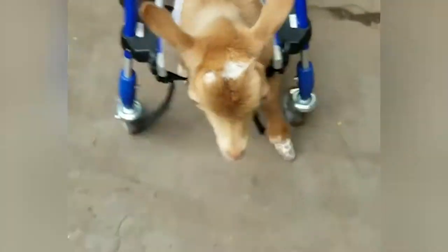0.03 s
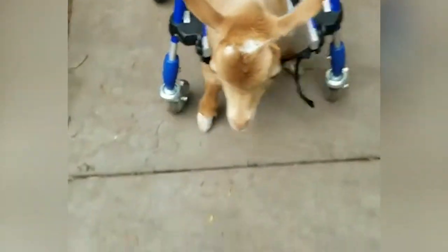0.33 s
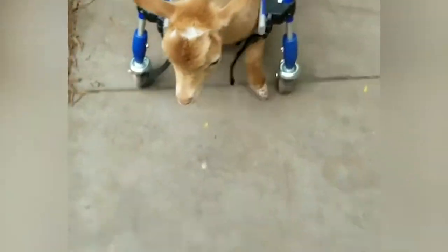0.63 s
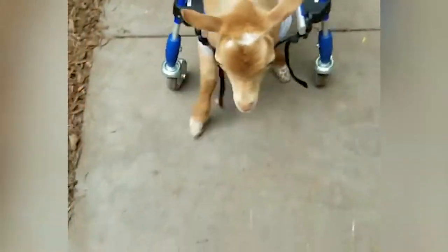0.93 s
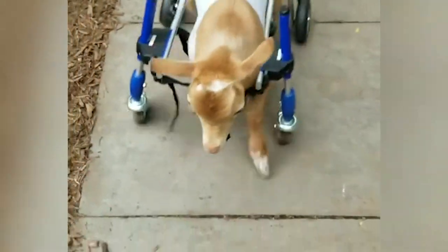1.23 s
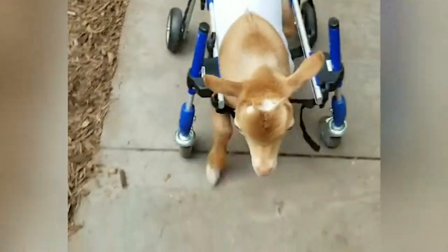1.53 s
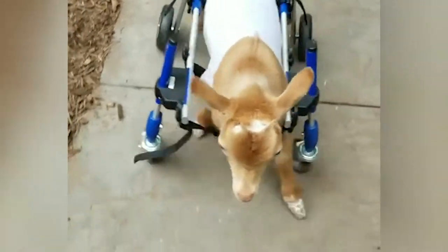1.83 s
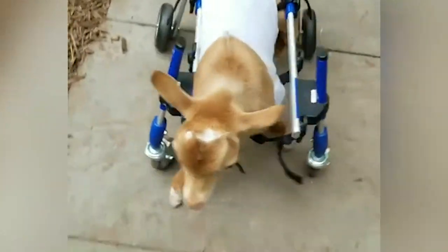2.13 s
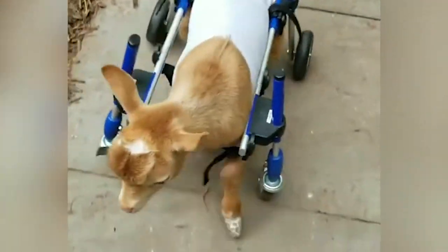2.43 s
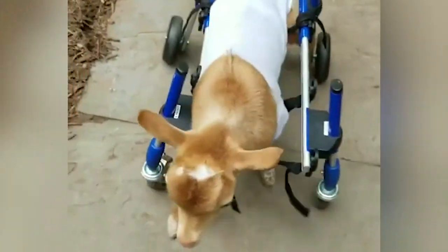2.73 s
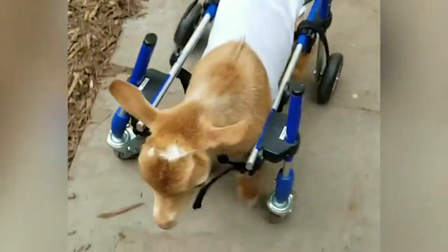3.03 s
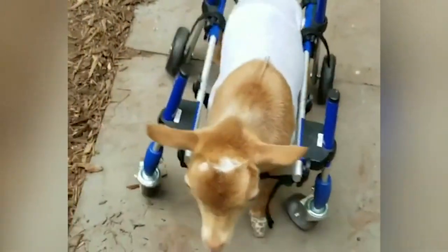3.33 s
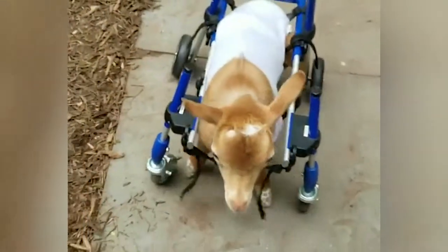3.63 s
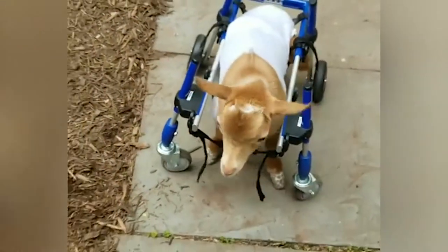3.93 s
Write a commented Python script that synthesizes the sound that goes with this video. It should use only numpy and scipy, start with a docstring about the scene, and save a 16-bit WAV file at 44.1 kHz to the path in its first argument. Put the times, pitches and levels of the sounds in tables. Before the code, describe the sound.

A small wheeled cart rattles over concrete close by in a quiet yard, with uneven metal clinks and plastic knocks above a gritty roll. A young goat's hooves tap and scuff in between, clearest near 1.4 and 2.6 seconds. A caster squeaks faintly at 2.4. Around 3.4 come quick taps, one sharp flick on the microphone's right side and a hollow knock; then the cart almost stops by 4 seconds.

```python
"""Goat in a wheeled cart

A young goat walks over concrete slabs in a small support cart, close by in a quiet yard.
Loose casters and frame joints clack over the gritty roll of the wheels; hooves tap and scuff between.
One caster squeaks, something flicks the right microphone port once, and the cart comes almost to rest."""
import sys
import numpy as np
from scipy import signal
from scipy.fft import rfft, irfft
from scipy.io import wavfile
from scipy.ndimage import uniform_filter1d

SR = 44100
rng = np.random.default_rng(int(sys.argv[2]) if len(sys.argv) > 2 else 0)


def transcribe(u):
    """Save the signal u as a 16-bit wav file named by the first command-line argument.

    u: samples, shape (n,) or (channels, n), limited to [-1, 1]; the rate is SR.
    q: integer samples, one column per channel.
    """
    v = np.clip(np.atleast_2d(u).T, -1, 1)
    q = np.round(v * 32767).astype(np.int16)
    wavfile.write(sys.argv[1], SR, q)


N = 176400

# Tone colours of the air, low rumble, wheel body, grit, hoof tap, plastic knock and metal clink.
# Each row: frequency in Hz, relative level in dB.
AIR_COLOUR = [(20, -13), (60, 9), (130, -2), (300, -24), (1000, -34), (3000, -25.5), (7500, -39.5),
              (9000, -65)]
RUMBLE_COLOUR = [(15, -21), (30, -15.5), (55, -2.5), (85, 2), (125, 2), (190, -6.5), (300, -16), (600, -32),
                 (2000, -77)]
WHEEL_COLOUR = [(80, -9), (250, 2), (450, 1.5), (800, 2.5), (1200, 1.5), (2200, -1.5), (3300, -13),
                (7000, -55)]
GRIT_COLOUR = [(1200, -20.5), (2400, 3), (3300, -1), (4300, -1), (5300, 0), (6000, -0.5), (6600, -12),
               (7400, -1), (8000, -3), (8700, -31.5), (9700, -58)]
HOOF_COLOUR = [(100, -14.5), (300, 3), (750, 1), (1500, -2), (2500, -4.5), (5000, -12.5), (9500, -43)]
KNOCK_COLOUR = [(100, -31), (250, 2), (450, -2), (800, 1), (1500, 2.5), (2500, 2.5), (3600, -7),
                (7000, -44.5)]
CLINK_COLOUR = [(1200, -40.5), (2300, -2.5), (3200, -2), (4200, 0.5), (5600, 0), (6200, -2), (6700, -5.5),
                (7500, -0.5), (8300, -9.5), (9500, -24.5), (10500, -49)]
# The yard's short tail. Each row: frequency in Hz, seconds to fall 60 dB.
YARD_DECAY = [(100, 0.29), (500, 0.21), (2000, 0.18), (5000, 0.18), (9000, 0.12)]
# Fader ride of the rumble. Each row: time in seconds, relative level in dB.
RUMBLE_RIDE = [(0.0, -47.5), (3.46, -51.5), (4.0, -61.5)]
# Fader rides of the roll. Each row: time in seconds, relative levels of grit and wheel body in dB.
ROLL_RIDE = [(0,-56,-55.5), (.23,-49,-53), (.28,-55,-55.5), (.385,-57,-60), (.43,-51.5,-50), (.51,-56,-54),
             (.57,-63,-65), (.62,-57.5,-51.5), (.8,-53.5,-57), (1.0,-53,-55), (1.28,-55,-55),
             (1.47,-50.5,-51.5), (1.605,-61,-58.5), (1.67,-50.5,-55.5), (1.92,-57,-54.5), (2.0,-46,-48.5),
             (2.12,-57.5,-63.5), (2.28,-52,-51.5), (2.45,-55,-57.5), (2.69,-44.5,-47), (2.78,-56,-56.5),
             (2.98,-52.5,-54), (3.19,-59.5,-64.5), (3.32,-59,-52), (3.45,-50,-55.5), (3.62,-63,-66),
             (3.72,-70,-70.5), (4.0,-76,-87)]
# Hoof scuffs and caster skids. Each row: start and length in seconds, relative level in dB, centre in Hz.
SCUFFS = [(.597,0.039,-44.5,1230), (.945,0.027,-42,4500), (1.185,0.032,-42,643), (1.37,0.066,-46.5,1600),
          (1.54,0.031,-37.5,4620), (1.66,0.056,-51,1460), (1.86,0.013,-46.5,2190), (1.95,0.12,-45.5,1450),
          (2.255,0.036,-47.5,1480), (2.61,0.05,-46,1400), (2.675,0.061,-43.5,2230), (2.93,0.053,-48.5,1640),
          (3.09,0.048,-50,4500), (3.40,0.056,-43.5,1220), (3.475,0.034,-41,1780), (3.575,0.046,-50.5,1410)]
# Low modes of the loaded cart. Each row: pitch in Hz, relative level in dB, seconds to fall 60 dB.
CART_MODES = [(97.6, -4.5, 0.097), (155, 1, 0.077), (264, -1, 0.046)]
# Hoof falls. Each row: start in seconds, relative levels of tap and thud in dB.
HOOF_FALLS = [(.116,-39,-41.5), (0.401,-39.5,-42), (1.192,-43,-49), (1.305,-36,-48), (1.351,-37,-35.5),
              (1.4066,-22.5,-43), (1.777,-40,-37.5), (2.588,-21,-33), (3.281,-29.5,-51), (3.304,-30.5,-45),
              (3.358,-27.5,-46.5), (3.425,-24.5,-41), (3.478,-33,-59)]
# Blows that ring the frame. Each row: start in seconds, level in dB, pitch in Hz.
FRAME_BLOWS = [(1.196,-38.5,638), (1.673,-33.5,1550), (2.918,-36.5,1540), (3.211,-32.5,3400),
               (3.425,-35,820), (3.478,-37.5,1087), (3.677,-52.5,1430), (3.872,-56,1476)]
# Caster and joint clacks.
# Each row: start in seconds, relative levels of clink, knock and thump in dB, ring pitch in Hz.
CLACKS = [(0.0809, -26.5, -39, -46, 4740), (0.157, -24, -35.5, -54, 3900), (0.2057, -32.5, -43, -50, 5200),
          (0.2255, -33, -40, -54, 5060), (0.417, -33.5, -46.5, -46, 4500),
          (0.4254, -32.5, -41, -41.5, 4900), (0.471, -24.5, -40, -47, 5400),
          (0.5268, -40, -41.5, -47, 4980), (0.537, -39.5, -48, -55, 5000),
          (0.5883, -23.5, -36, -33.5, 7500), (0.5923, -24.5, -37.5, -42.5, 7350),
          (0.6625, -24, -38.5, -42, 3500), (0.6732, -25, -36, -48, 5100), (0.712, -28.5, -41, -40.5, 3790),
          (0.7352, -20.5, -35, -42, 4900), (0.7505, -39, -48.5, -43.5, 5200),
          (0.828, -33.5, -47, -54, 5000), (0.8522, -24.5, -41, -45.5, 4740), (0.8659, -30, -48, -50, 4900),
          (0.8758, -35, -41, -52, 5150), (0.949, -32.5, -50.5, -50, 5600), (1.009, -44, -61, -58, 5200),
          (1.1708, -37, -45, -59, 7900), (1.202, -31.5, -47, -49, 7300),
          (1.4356, -20.5, -38.5, -36.5, 5160), (1.5159, -35.5, -51, -56, 5600),
          (1.6269, -22.5, -40.5, -35.5, 4800), (1.6448, -41, -43, -52, 5800),
          (1.6727, -24.5, -39.5, -39.5, 5400), (1.719, -43, -46.5, -53, 5240),
          (1.738, -28, -41.5, -56, 3650), (1.757, -31, -43.5, -50, 5300), (1.944, -16.5, -38.5, -40, 4900),
          (1.9747, -28.5, -40, -47, 4850), (1.9828, -22, -43, -44.5, 4970), (1.99, -29, -40, -41.5, 5000),
          (2.0191, -24.5, -40, -37, 3800), (2.0744, -40.5, -43.5, -51, 3120),
          (2.1363, -42.5, -52, -59, 5460), (2.223, -33, -42, -50, 5630), (2.2444, -30.5, -40, -42.5, 3820),
          (2.3003, -35, -44.5, -46, 5970), (2.3205, -39, -46, -53, 4800), (2.5163, -33, -47, -42.5, 3330),
          (2.597, -18.5, -32.5, -43, 5300), (2.6023, -23.5, -35, -41, 3040), (2.672, -26, -34, -40.5, 3700),
          (2.8086, -34, -47, -48, 3450), (2.9162, -28.5, -39, -42, 4700), (2.9971, -35, -42.5, -61, 5260),
          (3.018, -38, -47.5, -49, 4730), (3.2107, -27.5, -48, -62, 3200),
          (3.3922, -35.5, -40.5, -46, 3080), (3.4263, -25, -37.5, -46, 3650),
          (3.4488, -27.5, -42.5, -53, 5170), (3.5971, -41, -59, -53, 5700), (3.7771, -45.5, -54, -67, 3370),
          (3.9527, -53.5, -66, -60, 3360)]
# Balance of the two microphone ports. Each row: frequency in Hz, right over left in dB.
PORT_BALANCE = [(100, -2), (800, 0.5), (1500, -3.5), (2200, -0.5), (3000, 2), (3900, 8), (4700, 14),
                (5500, 13.5), (6100, 9), (6700, -2), (7400, 11.5), (8500, 1.5)]
# How alike the ports sound. Each row: frequency in Hz, correlation from 0 to 1.
PORT_LIKENESS = [(50, 1), (300, 1), (1000, 0.94), (2000, 0.22), (4000, 0.49), (8000, 0.58)]
# Phase between the ports. Each row: frequency in Hz, lead of the left in radians.
PORT_LEAD = [(1000, 0), (2200, 0), (3700, 1), (4700, 3), (5400, 3.5), (7500, 4.5), (9000, 5)]

ATTACK_S, PRE_ROLL_S = 0.0005, 0.008


def amp(db):
    """Decibels to gain."""
    return 10 ** (np.asarray(db) / 20)


def unit_rms(x):
    """Scales to rms 1."""
    return x / np.sqrt(np.mean(x ** 2) + 1e-20)


def unit_hit(burst):
    """Scales a burst to the energy of two milliseconds at rms 1."""
    return unit_rms(burst) * np.sqrt(.002 * SR / burst.shape[1])


def curve_at(points, hz):
    """Reads a table on a log-frequency axis."""
    f, value = np.transpose(points)
    return np.interp(np.log(hz + 1), np.log(f + 1), value)


def fader(rows, column):
    """Gain over time from one dB column of a ride."""
    rows = np.array(rows)
    return amp(np.interp(np.arange(N) / SR, rows[:, 0], rows[:, column]))


def add(mix, start, sound):
    """Drops a sound into the mix at a time in seconds."""
    part = mix[:, max(round(start * SR), 0):][:, :sound.shape[-1]]
    part += sound[..., :part.shape[1]]


def colour(x, points):
    """An EQ curve that keeps the power of white noise."""
    return irfft(rfft(x) * unit_rms(amp(curve_at(points, np.fft.rfftfreq(N, 1 / SR)))), N)


def causal(gain):
    """Gives a spectrum the phase of a struck object: it rings only after the blow."""
    log_gain = np.log(np.maximum(gain, 1e-5))
    mirrored = np.concatenate([log_gain, log_gain[-2:0:-1]])
    return np.exp(np.conj(signal.hilbert(mirrored)))[:len(gain)]


def air(db=-57):
    """A low bed of outdoor air with a trace of hiss."""
    return amp(db) * colour(rng.standard_normal((2, N)), AIR_COLOUR)


def yard(x, wet_db=-13, build_s=0.0068):
    """Diffuse reflections off the paving and nearby walls."""
    hz, t, spectra = signal.stft(rng.standard_normal((2, SR // 2)), SR, nperseg=256)
    tail = signal.istft(spectra * amp(-60 * t / curve_at(YARD_DECAY, hz)[:, None]), SR, nperseg=256)[1]
    tail *= np.minimum(np.arange(tail.shape[1]) / SR / build_s, 1) ** 2
    return amp(wet_db) * signal.fftconvolve(x, tail / np.linalg.norm(tail[0]), axes=1)[:, :N]


def grains(per_s, spread_db, rub, decay_s=0.0016):
    """Tiny random impacts of uneven size over a smooth rub."""
    size = (rng.random(N) < per_s / SR) * amp(spread_db * np.minimum(rng.exponential(1, N), 3.8))
    power = signal.lfilter([1], [1, -np.exp(-1 / (decay_s * SR))], size ** 2)
    return unit_rms(np.sqrt(power / power.mean() + rub) * rng.standard_normal((2, N)))


def uneven(x, patch_db=3, swell_db=2.5):
    """The paving changes under each wheel: level and colour wander."""
    spectra = signal.stft(x, nperseg=512)[2]
    patches = uniform_filter1d(rng.standard_normal(spectra.shape[1:]), size=4, axis=0)
    patches = unit_rms(uniform_filter1d(patches, size=7, axis=1))
    swell = unit_rms(uniform_filter1d(rng.standard_normal(spectra.shape[2]), size=4))
    spectra = spectra * amp(patch_db * patches + swell_db * swell)
    return unit_rms(signal.istft(spectra, nperseg=512)[1][:, :N])


def wheels(grit_db=1, rumble_db=-3):
    """Wheels crunch over the rough concrete and shake the frame."""
    grit = colour(uneven(grains(per_s=690, spread_db=4.5, rub=0.33)), GRIT_COLOUR)
    body = colour(uneven(grains(per_s=350, spread_db=3, rub=0.68)), WHEEL_COLOUR)
    rumble = colour(rng.standard_normal((2, N)), RUMBLE_COLOUR)
    roll = amp(grit_db) * grit * fader(ROLL_RIDE, 1) + body * fader(ROLL_RIDE, 2)
    return roll + amp(rumble_db) * rumble * fader(RUMBLE_RIDE, 1)


def squeak(start=2.38, length_s=0.11, hz=3935, sag_hz=60, waver_hz=90, db=-47):
    """A caster whistles faintly as it swivels."""
    out, progress = np.zeros((2, N)), np.linspace(0, 1, round(length_s * SR))
    waver = unit_rms(uniform_filter1d(rng.standard_normal(N), size=60))[:len(progress)]
    pitch = hz - sag_hz * progress + waver_hz * waver
    swell = np.sin(np.pi * np.sqrt(progress))
    add(out[:1], start, amp(db) * swell * np.sin(2 * np.pi * np.cumsum(pitch) / SR))
    return out


def scuffs(trim_db=-2, width_octaves=1.56):
    """Hooves and casters make short gritty slides over the concrete."""
    out, t = np.zeros((2, N)), np.arange(SR // 4) / SR
    crunch = uneven(grains(per_s=500, spread_db=2.5, rub=0.32))
    hz = np.fft.rfftfreq(len(t), 1 / SR)
    for k, (start, length_s, db, centre_hz) in enumerate(SCUFFS):
        band = np.exp(-(np.log2((hz + 1) / centre_hz) / width_octaves) ** 2) / (1 + (hz / 6000) ** 10)
        stretch = crunch[:, k * (SR // 8):][:, :len(t)]
        slide = unit_rms(irfft(rfft(stretch) * band, len(t)))
        swell = np.sin(np.pi * np.minimum(t / length_s, 1) ** 0.9)
        add(out, start, amp(db + trim_db) * slide * swell)
    return out


def flick(start=3.3742, snap_hz=1600, snap_db=-8, boom_hz=115, boom_db=-25, boom_s=0.0172):
    """A flick on the right port alone: a sharp snap and a short low boom."""
    out, t = np.zeros((2, N)), np.arange(SR // 10) / SR
    phase = 2 * np.pi * snap_hz * t - np.pi
    snap = amp(snap_db) * phase * np.exp((1 - phase ** 2) / 2)
    boom = amp(boom_db) * np.sin(2 * np.pi * boom_hz * t) * np.exp(-(t / boom_s) ** 2)
    add(out[1:], start, snap + boom)
    return out


def contact(length_s, grain_db, touch_db=-12, touch_s=0.0012, bounce_db=3, bounce_s=0.00032):
    """A faint first touch, a sudden strike, then two hard bounces in chatter that stops abruptly."""
    t = np.arange(SR // 16) / SR - PRE_ROLL_S
    grain = amp(grain_db * unit_rms(uniform_filter1d(rng.standard_normal(len(t)), size=24)))
    touch = amp(touch_db) * np.exp(np.minimum(t, 0) / touch_s)
    attack = np.maximum(np.clip(t / ATTACK_S, 0, 1), touch)
    gate = np.exp(-(np.maximum(t, 0) / length_s) ** 4.6)
    since_hit = t[:, None] - ATTACK_S - length_s * np.arange(3) * rng.uniform(.7, 1.2, 3) / 3
    spikes = ((since_hit > 0) * np.exp(-abs(since_hit / bounce_s))).sum(1)
    return unit_hit(attack * gate * (grain + amp(bounce_db) * spikes) * rng.standard_normal((2, len(t))))


def jolt(detune=.18, attack_s=0.0039):
    """The cart shudders in its low modes, a little differently each time."""
    t, shudder = np.arange(SR // 8) / SR, 0
    for hz, db, t60 in CART_MODES:
        pitch = hz * (1 + detune * rng.uniform(-0.91, 1))
        shudder += amp(db - 60 * t / t60) * np.sin(2 * np.pi * (pitch * t + rng.random()))
    return np.minimum(t / attack_s, 1) * shudder


def hooves(tap_trim_db=-8.5, thud_trim_db=1.5):
    """A dry tap of horn on concrete with a soft thud."""
    tap, thud = np.zeros((2, 2, N))
    for start, tap_db, thud_db in HOOF_FALLS:
        add(tap, start - PRE_ROLL_S, amp(tap_db + tap_trim_db) * contact(length_s=.003, grain_db=5))
        add(thud[:1], start, amp(thud_db + thud_trim_db) * jolt())
    return colour(tap, HOOF_COLOUR) + thud


def frame_pings(t60=0.052):
    """A damped part of the frame rings briefly at each blow."""
    out, t = np.zeros((2, N)), np.arange(SR // 8) / SR
    attack = np.minimum(t / ATTACK_S, 1)
    for start, db, hz in FRAME_BLOWS:
        add(out[:1], start, attack * amp(db - 60 * t / t60) * np.sin(2 * np.pi * hz * t))
    return out


def bump(start=3.425, hz=320, db=-25.5, length_s=0.005):
    """A short hollow knock as a hoof stamps down."""
    out, t = np.zeros((2, N)), np.arange(SR // 10) / SR
    add(out[:1], start, amp(db) * np.sin(2 * np.pi * hz * t) * np.exp(-(t / length_s) ** 2))
    return out


def metal_ring(burst, ring_hz, width_hz=780, ring_db=1.5, ripple_hz=381, ripple_db=4.5):
    """Each struck metal part has one damped main resonance among uneven lesser ones."""
    hz = np.fft.rfftfreq(burst.shape[1], 1 / SR)
    ripple = np.interp(hz / ripple_hz, np.arange(128), rng.standard_normal(128))
    lesser = causal(amp(curve_at(CLINK_COLOUR, hz) + ripple_db * ripple))
    main = 1 + amp(ring_db) / (1 + 2j * (hz - ring_hz) / width_hz)
    return unit_hit(irfft(rfft(burst) * main * lesser))


def clacks(clink_trim_db=-2.5, knock_trim_db=3, thump_trim_db=1.5):
    """Loose casters and joints strike: a bright metal clink, a plastic knock, a thump in the frame."""
    clink, knock, thump = np.zeros((3, 2, N))
    for start, clink_db, knock_db, thump_db, ring_hz in CLACKS:
        metal = metal_ring(contact(length_s=.0044, grain_db=1.5), ring_hz)
        plastic = contact(length_s=.0066, grain_db=2)
        add(clink, start - PRE_ROLL_S, amp(clink_db + clink_trim_db) * metal)
        add(knock, start - PRE_ROLL_S, amp(knock_db + knock_trim_db) * plastic)
        add(thump[:1], start, amp(thump_db + thump_trim_db) * jolt())
    return clink + colour(knock, KNOCK_COLOUR) + thump


def ports(x):
    """Two microphone ports: alike and in phase in the bass, the right one resonant near 5 kHz."""
    hz = np.fft.rfftfreq(N, 1 / SR)
    shared, right_only = rfft(x)  # the first channel feeds both ports
    likeness, tilt = curve_at(PORT_LIKENESS, hz), amp(curve_at(PORT_BALANCE, hz) / 2)
    right = likeness * shared + np.sqrt(1 - likeness ** 2) * right_only
    right *= np.exp(-1j * curve_at(PORT_LEAD, hz))
    return irfft(np.array([shared / tilt, right * tilt]), N)


def scene():
    """Cart and hooves in a quiet yard; only the hits and scuffs feed the reflections."""
    hits = clacks() + hooves() + frame_pings() + bump() + scuffs()
    return ports(air() + hits + yard(hits) + wheels() + squeak()) + flick()


def record(dry):
    """A steep low-pass at 10.7 kHz takes off the top end."""
    low_pass = signal.firwin(255, 10700, window=("kaiser", 8), fs=SR)
    return signal.oaconvolve(dry, low_pass[None], "same")


dry = scene()
out = record(dry)
transcribe(out)
```